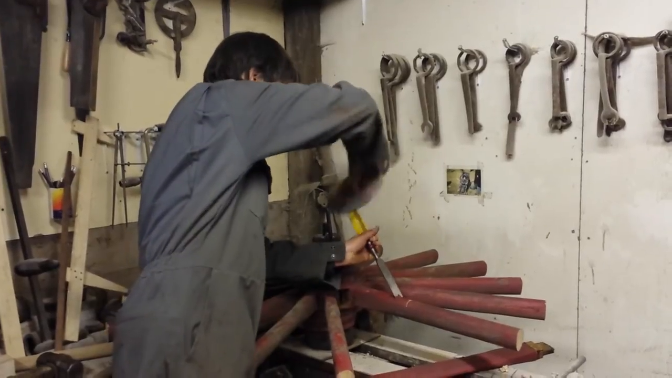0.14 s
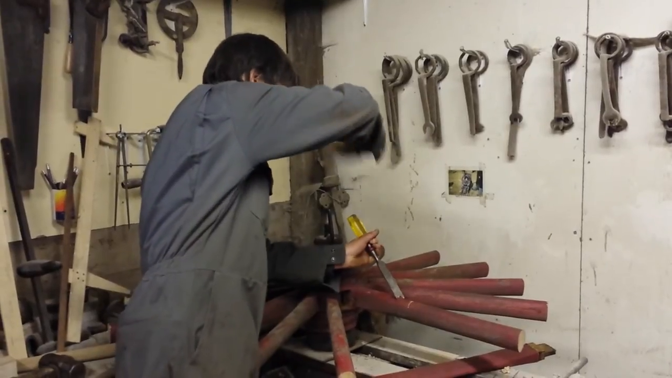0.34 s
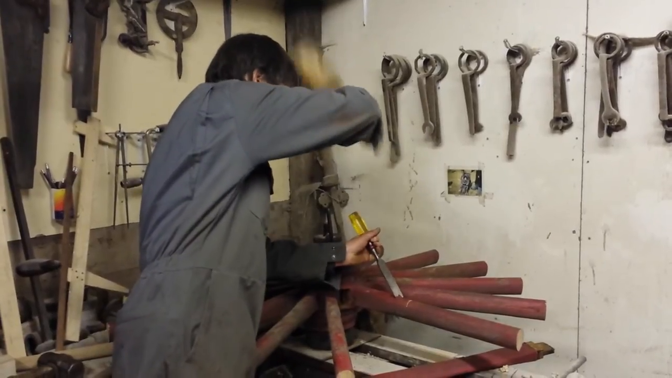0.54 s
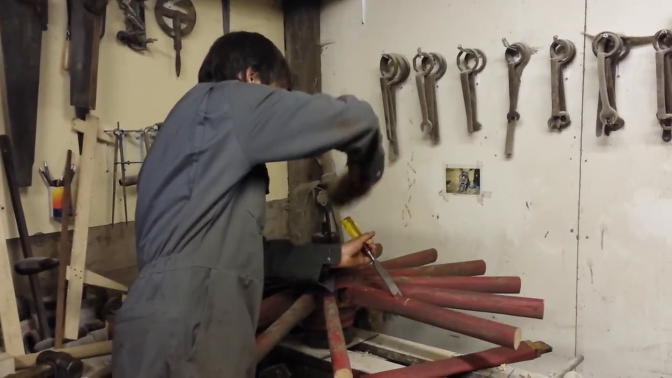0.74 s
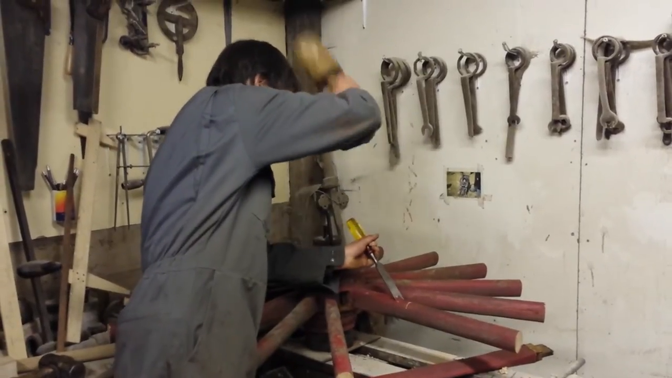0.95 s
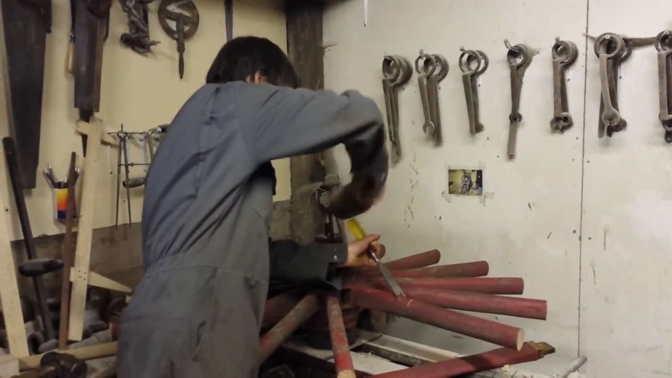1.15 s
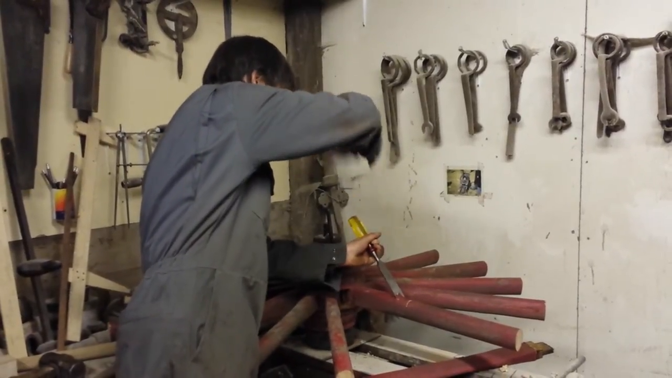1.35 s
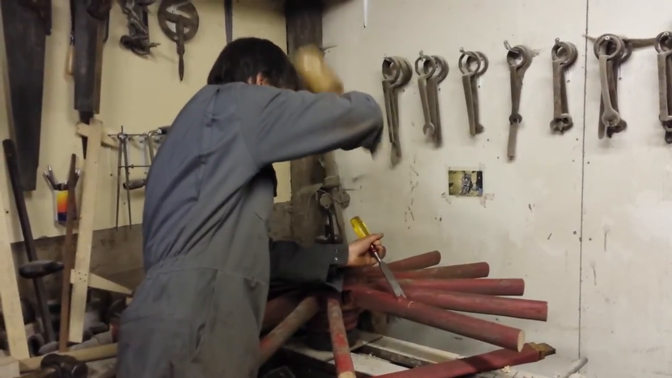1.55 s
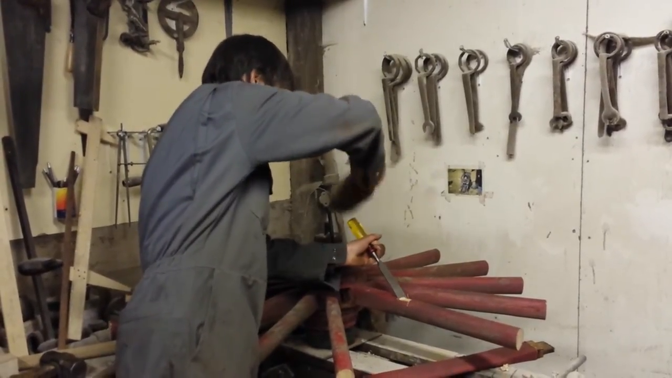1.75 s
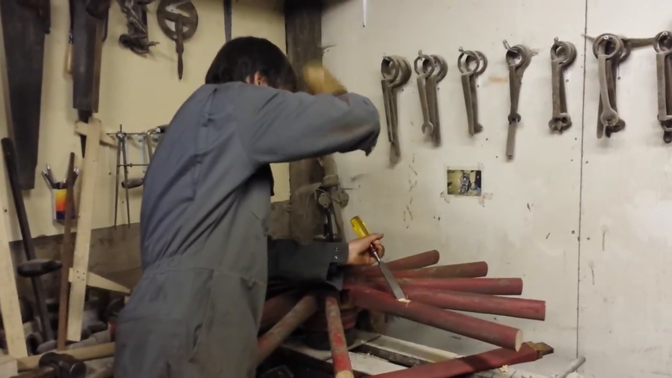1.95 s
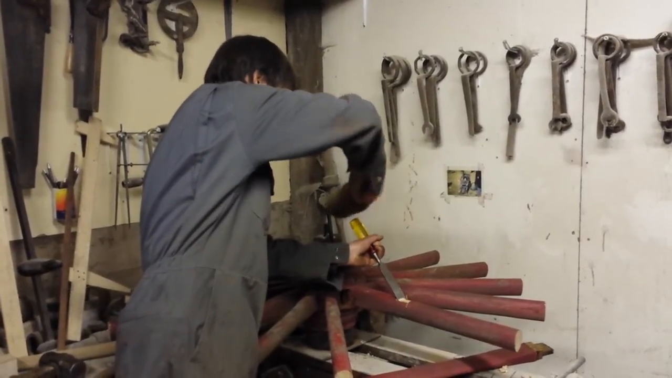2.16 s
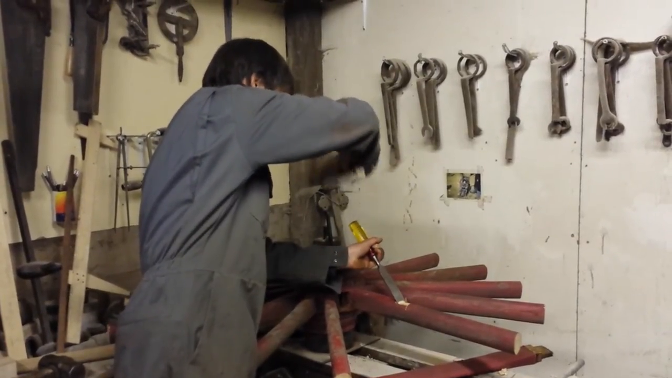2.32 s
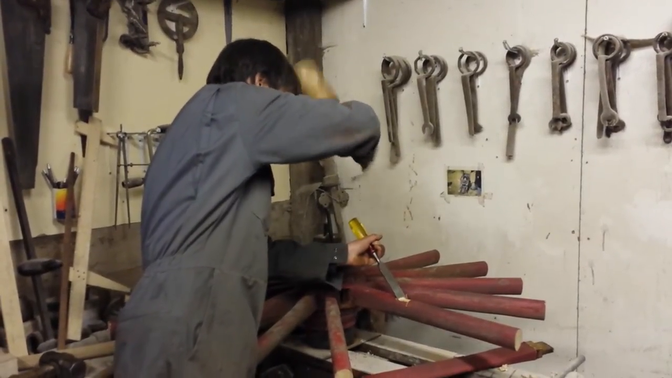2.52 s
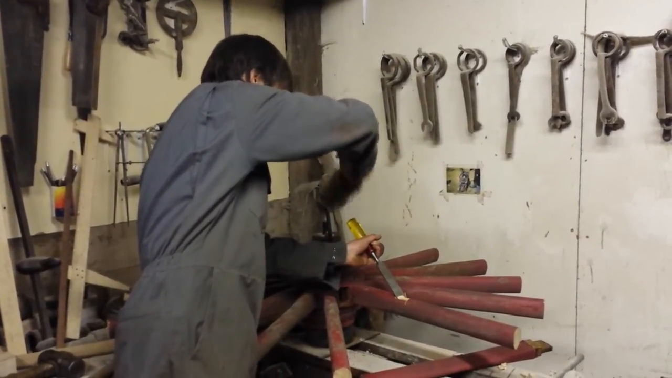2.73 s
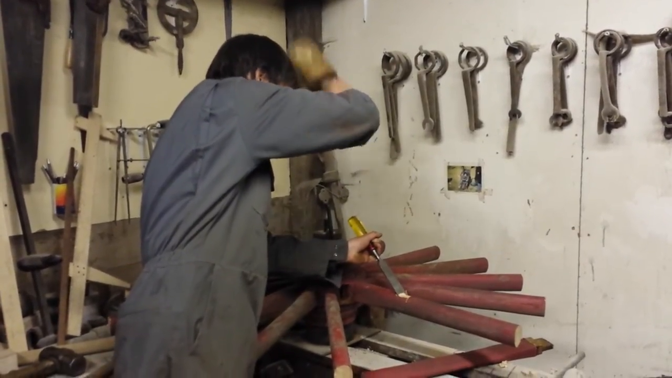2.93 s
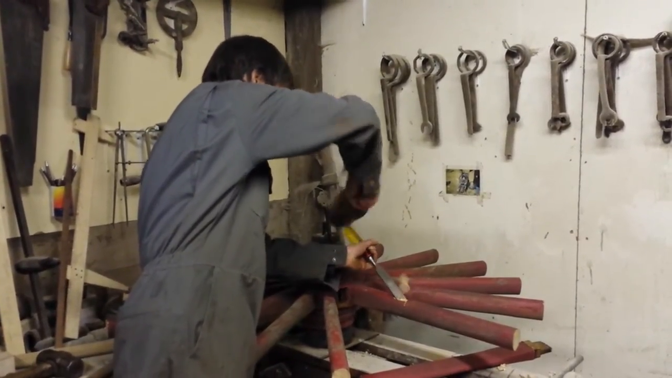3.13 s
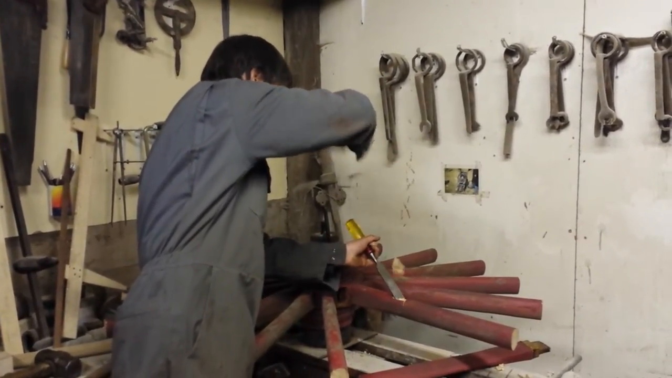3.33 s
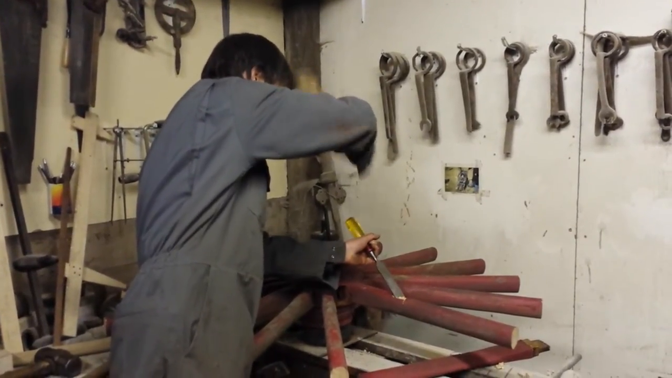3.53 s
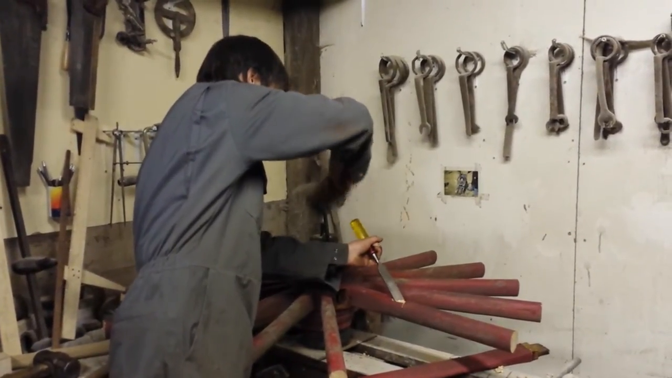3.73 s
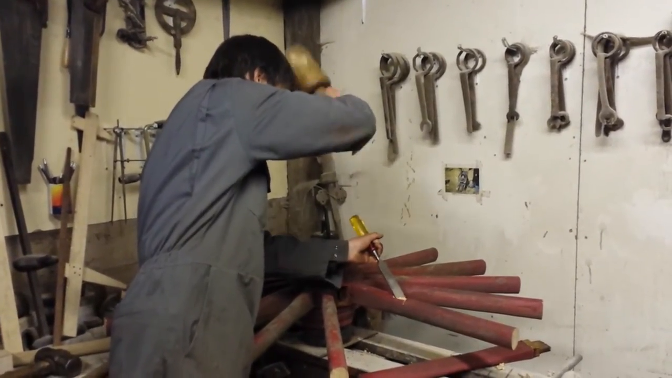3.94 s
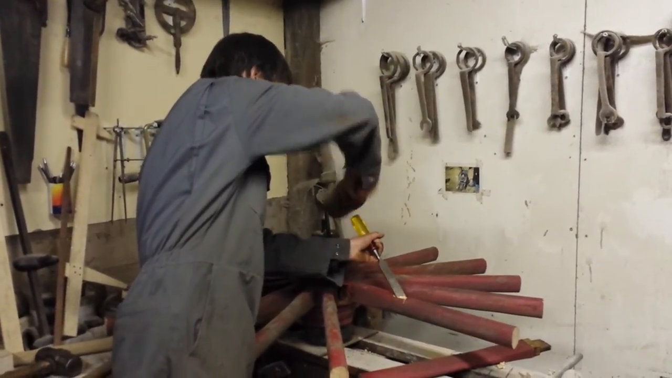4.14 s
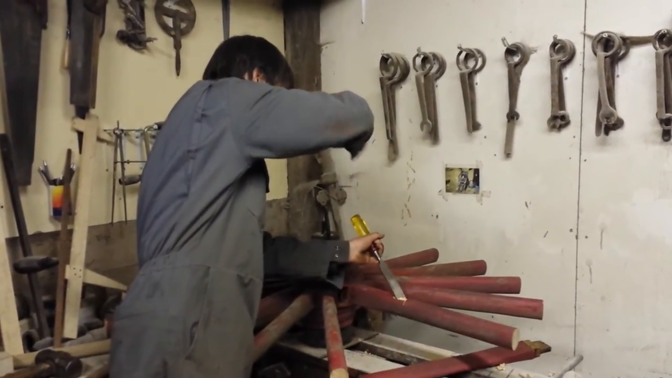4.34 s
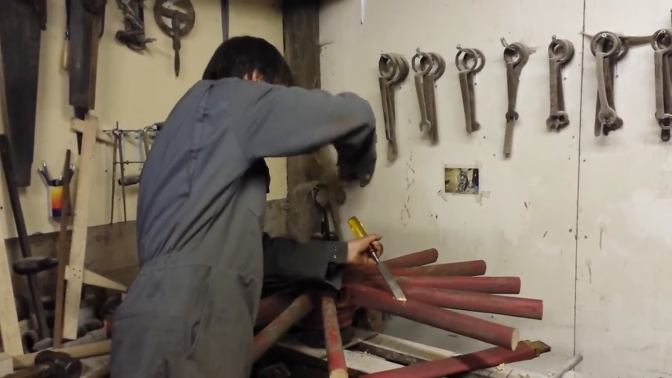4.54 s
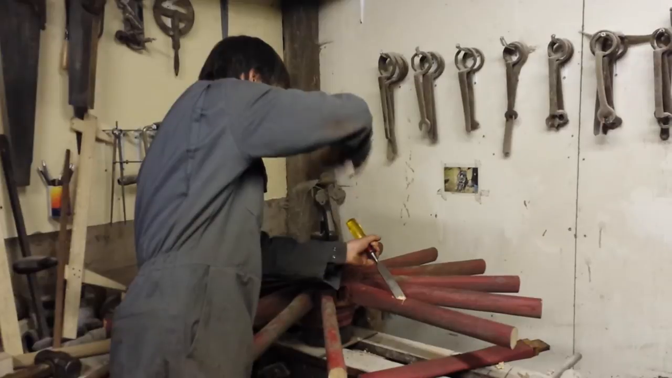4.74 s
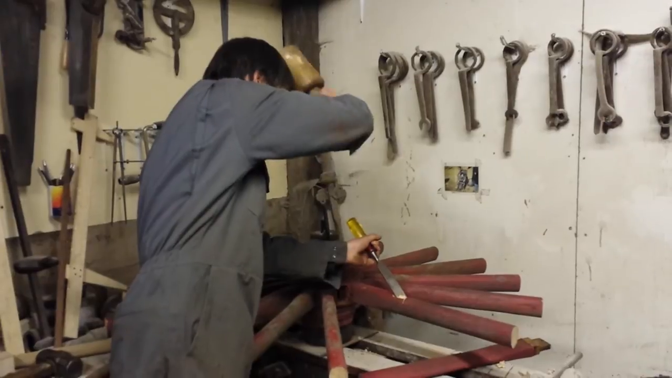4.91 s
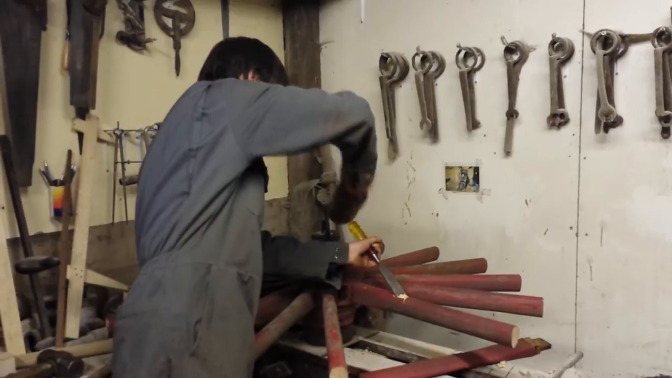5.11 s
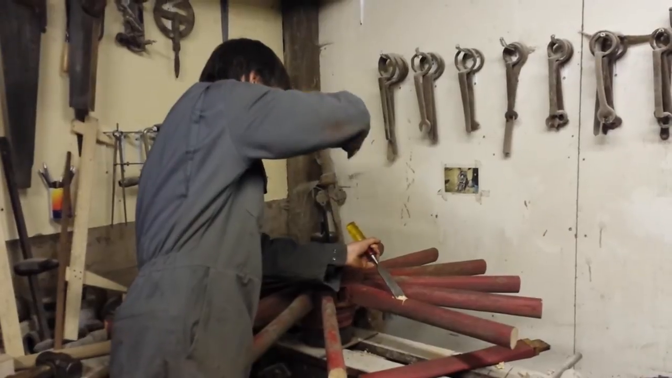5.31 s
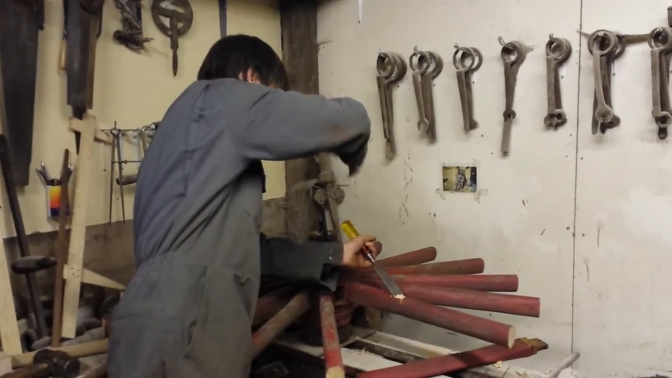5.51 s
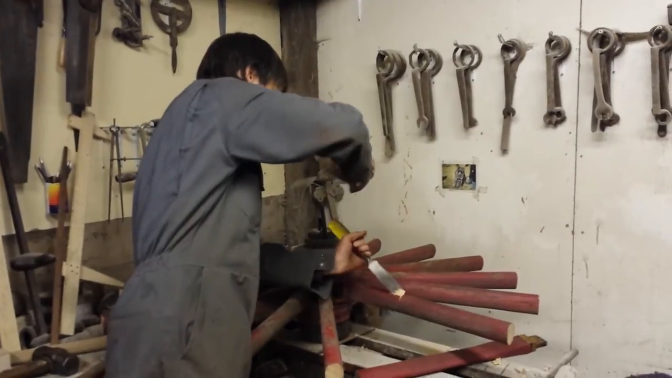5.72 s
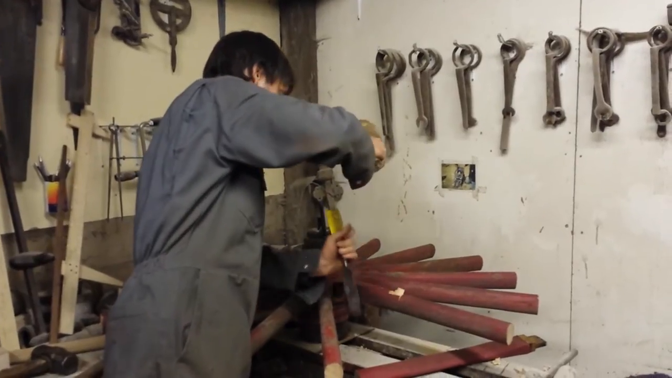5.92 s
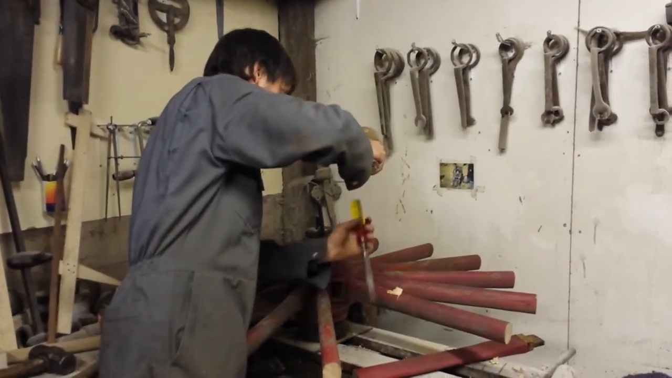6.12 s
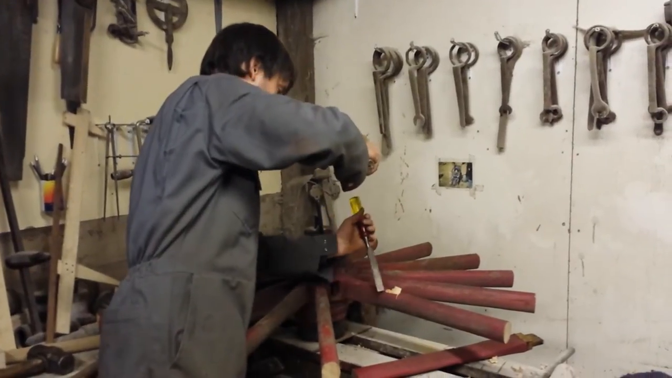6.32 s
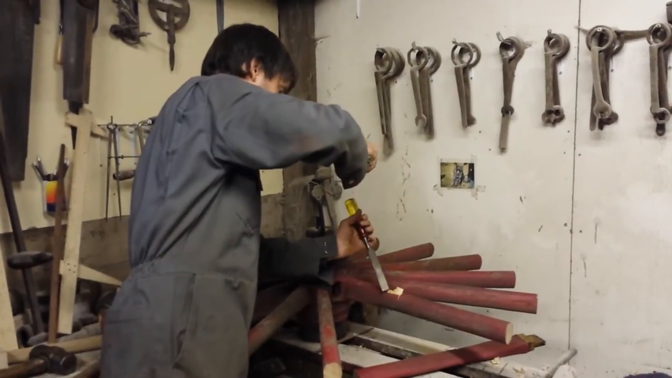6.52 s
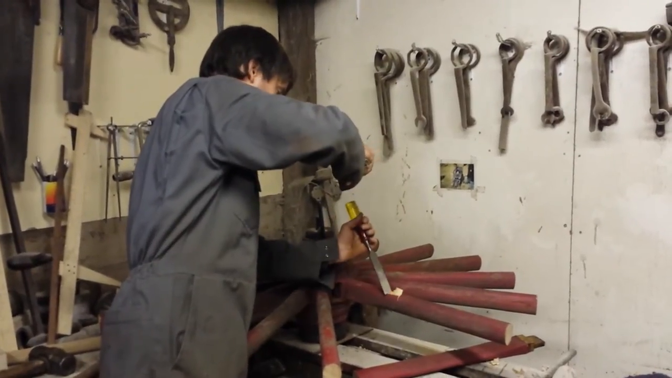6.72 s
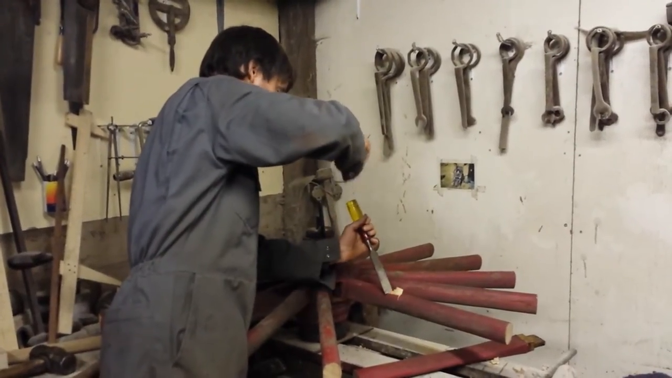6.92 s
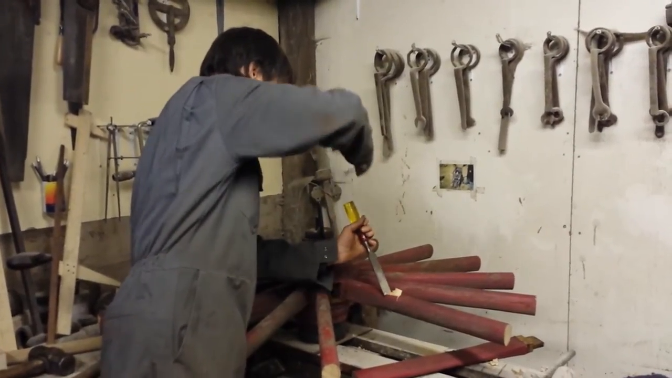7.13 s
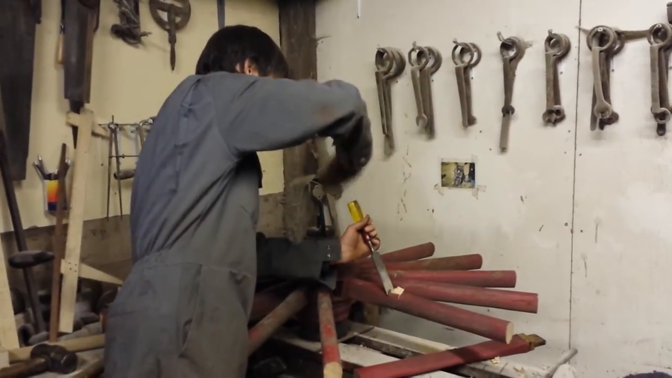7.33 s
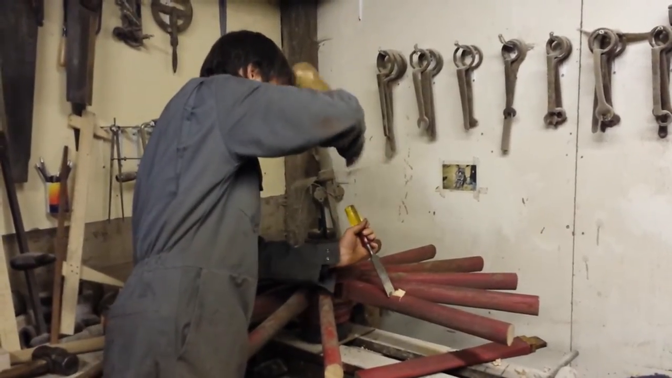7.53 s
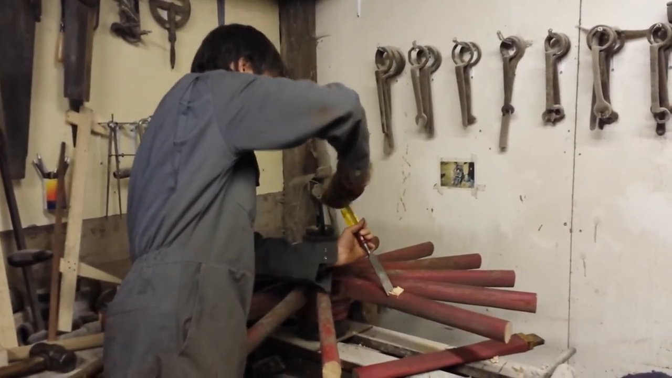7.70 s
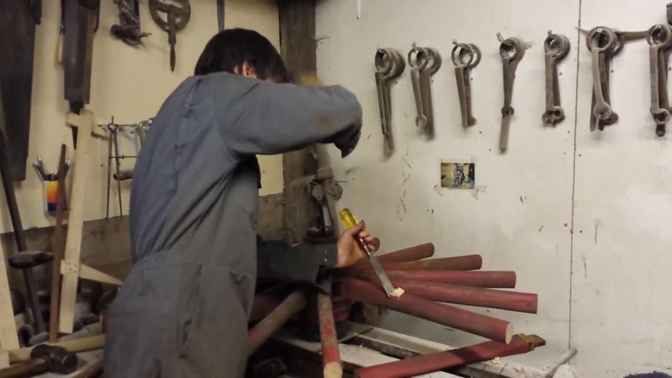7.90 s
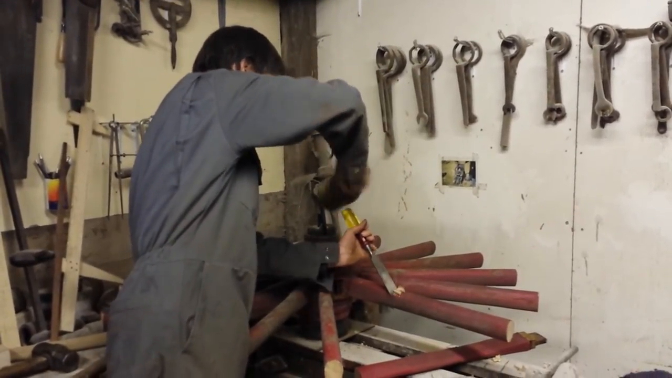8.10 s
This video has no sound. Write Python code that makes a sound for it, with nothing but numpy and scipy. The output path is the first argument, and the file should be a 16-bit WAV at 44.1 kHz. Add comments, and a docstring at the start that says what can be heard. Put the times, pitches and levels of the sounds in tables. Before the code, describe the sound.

In a small hard-walled workshop, a mallet drives a chisel into a log with loud, evenly spaced knocks, each a dull thud with a bright crack and short bench boom. Loose iron ticks and wood shivers between blows; small chips snap and land. The blows stop, the chisel edge touches the wood softly twice, then three quicker blows follow. Close stereo microphone, faint hiss.

```python
"""A small hard-walled workshop, with a stereo microphone a few steps from a log being cut with mallet and chisel.
Behind everything lie room tone and hiss; loose iron ticks and offcuts shiver after each blow, as decaying bursts.
Chips land as short pitched ticks, and in a pause the chisel edge is set twice on the wood.
Nearest are the blows: damped modes for logs and bench, coloured bursts for the dull thud and the bright crack."""
import sys
import numpy as np
from scipy import signal
from scipy.fft import rfft, irfft, next_fast_len
from scipy.io import wavfile
from scipy.ndimage import uniform_filter1d

SR = 44100
rng = np.random.default_rng(int(sys.argv[2]) if len(sys.argv) > 2 else 0)


def pcm_store(signal):
    """Save signal as 16-bit PCM."""
    levels = np.round(np.clip(np.atleast_2d(signal), -1, 1) * 32767)
    wavfile.write(sys.argv[1], SR, levels.astype(np.int16).T)


N = 359856  # samples, about 8.2 s
SECOND_CUT_S = 6  # blows after this time belong to the second cut


def amp(db):
    """Decibels to amplitude."""
    return 10 ** (np.asarray(db) / 20)


def unit(x):
    """Scale to an RMS of one."""
    return x / np.sqrt(np.mean(x ** 2) + 1e-20)


def along(points, hz):
    """Read a curve of (frequency [Hz], value) points on a log frequency axis."""
    f, v = np.transpose(points)
    return np.interp(np.log(hz + 1), np.log(f + 1), v)


def coloured(x, gain_db):
    """Pass x through a causal minimum-phase filter with this gain over frequency."""
    m = 2 * next_fast_len(x.shape[-1] // 2 + 4096)
    gain = amp(gain_db(np.fft.rfftfreq(m, 1 / SR)))
    cepstrum = irfft(np.log(gain + 1e-6), m)
    # folding the cepstrum onto positive times makes the filter causal
    cepstrum[..., 1:m // 2] *= 2
    cepstrum[..., m // 2 + 1:] = 0
    response = np.exp(rfft(cepstrum))
    return irfft(rfft(x, m) * response, m)[..., :x.shape[-1]]


# likeness of left and right in diffuse sound: (frequency [Hz], correlation [0-1])
LIKENESS = [(25, .7), (70, .996), (130, .985), (290, .89), (640, .8), (1390, .15), (3000, .05)]


def stereo_noise(size):
    """Spectrogram of stereo noise, alike in the bass and unrelated in the treble."""
    hz, t, (a, b) = signal.stft(rng.standard_normal((2, size)), SR, nperseg=256)
    turn = np.arccos(np.clip(along(LIKENESS, hz), -1, 1))[:, None] / 2
    left = np.cos(turn) * a + np.sin(turn) * b
    right = np.cos(turn) * a - np.sin(turn) * b
    return hz, t, np.array([left, right])


# reverberation of the workshop: (frequency [Hz], 60 dB decay time [s])
ROOM_DECAY = [(60, 0.89), (120, .6), (300, 0.4), (700, 0.37), (1500, 0.3), (4000, 0.3), (8000, .24),
              (11000, .19), (14000, 0.037)]
# early echoes: (delay [s], level against the direct sound, before the walls_db offset [dB])
WALL_ECHOES = [(.0045, 3), (.009, -5.5), (.0125, -12.5), (0.02, -18), (.031, -11)]


def in_room(sound, wet_db, walls_db=0):
    """Direct sound, early wall echoes and a fresh diffuse tail whose decay depends on frequency."""
    hz, t, z = stereo_noise(SR // 2)
    fade = amp(-60 * t / along(ROOM_DECAY, hz)[:, None])
    z = z * fade
    # each band keeps its usual strength, whatever the noise drew
    z *= np.linalg.norm(fade, axis=-1, keepdims=True) / np.linalg.norm(z, axis=-1, keepdims=True)
    response = signal.istft(z, SR, nperseg=256)[1]
    response *= 1 - np.exp(-np.arange(response.shape[1]) / SR / .0015)  # echoes thicken quickly
    response *= amp(wet_db) / np.linalg.norm(response, axis=1, keepdims=True)
    response[:, 0] += 1  # direct sound
    for delay_s, db in WALL_ECHOES:
        arrival_s = delay_s + rng.normal(0, .0002, 2)  # slightly apart in left and right
        response[[0, 1], np.round(arrival_s * SR).astype(int)] += amp(db + walls_db)
    return signal.fftconvolve(sound[None], response, axes=1)


def ring(modes, t, spread_db, attack):
    """Damped modes (frequency [Hz], level [dB], 60 dB decay [s]), struck at new strengths each time."""
    hz, db, t60 = np.transpose(modes)[..., None]
    level = db + spread_db * rng.standard_normal(hz.shape)
    envelope = amp(level - 60 * t / t60) * (1 - np.exp(-t / attack))
    return envelope * np.sin(2 * np.pi * hz * t)


def burst(t, t60, grit, gain_db):
    """A contact pulse with gritty decaying noise, coloured; the energy of one millisecond at amplitude 1."""
    noise = amp(-60 * t / t60) * rng.standard_normal(len(t))
    pulse = t == 0
    puff = coloured(pulse + grit * noise / np.linalg.norm(noise), gain_db)
    return puff / np.linalg.norm(puff) * np.sqrt(SR / 1000)


def add(track, s, sound):
    """Mix into a track that starts one second early."""
    part = track[..., SR + round(s * SR):][..., :sound.shape[-1]]
    part += sound[..., :part.shape[-1]]


# spectrum of room tone and microphone hiss: (frequency [Hz], relative level per Hz [dB])
HUSH_SPECTRUM = [(20, -6), (50, -10), (104, 1), (125, -4), (200, -3), (400, -10), (800, -14), (2000, -18),
                 (4000, -20), (6200, -15), (8000, -21), (12000, -24), (14500, -25), (15000, -50)]
HUSH_DB = -69  # RMS level


def hush():
    """Room tone and hiss: coloured stereo noise with slow, smooth patches of level."""
    z = stereo_noise(N)[2]
    patches = rng.standard_normal(z.shape[1:])
    patches = uniform_filter1d(patches, size=4, axis=0)  # over frequency
    patches = uniform_filter1d(patches, size=30, axis=1)  # over time
    noise = signal.istft(z * amp(2.1 * unit(patches)), SR, nperseg=256)[1][:, :N]
    return amp(HUSH_DB) * unit(coloured(noise, lambda hz: along(HUSH_SPECTRUM, hz)))


# modes of the loose iron tool: (frequency [Hz], relative level [dB], 60 dB decay time [s])
IRON_MODES = [(2990, -4, .015), (3700, -4, .015), (4285, -6, .015), (5943, 1, .025), (6940, -5, .015),
              (8592, -6, .04)]
# spectrum of the shivering offcuts: (frequency [Hz], relative level per Hz [dB])
OFFCUT_SPECTRUM = [(150, -20), (330, -11.5), (520, -0.5), (750, -10.5), (1500, -14.5), (3000, -31.5)]
IRON_RING_DB, IRON_FADE_DB_PER_S = -1, 9  # gain of the ring beside its click; fade after a blow
WOOD_DB, WOOD_FADE_DB_PER_S = -52, 22.5  # offcuts against the level of the blow; fade after a blow
SETTLE_S, SETTLE_DB_PER_S = 0.68, 150  # left alone this long, everything comes to rest
ROCK_S, ROCK_SCATTER_S = .026, .0015  # time between contacts of the rocking iron


def chatter():
    """Each blow leaves a loose iron tool rocking in faint ticks and offcuts shivering until they settle."""
    blow_s, blow_db, *_, shaken_db = np.transpose(BLOWS_STRUCK)
    times = np.cumsum(rng.normal(ROCK_S, ROCK_SCATTER_S, size=400))
    times = times[times < N / SR]
    last = np.searchsorted(blow_s, times) - 1
    since = times - blow_s[last]
    settle_db = SETTLE_DB_PER_S * np.maximum(since - SETTLE_S, 0)
    iron_db = shaken_db[last] - IRON_FADE_DB_PER_S * since - settle_db
    wood_db = blow_db[last] + WOOD_DB - WOOD_FADE_DB_PER_S * since - settle_db
    # contacts take turns on three tracks, each given its own room response
    tool, offcuts = np.zeros((3, N + SR)), np.zeros((3, N + SR))
    t = np.arange(SR // 16) / SR
    for k, at in enumerate(times):
        click = burst(t, .008, 2.5, lambda hz: -4 * np.log2(hz / 5500 + 1e-3) ** 2)
        iron_ring = ring(IRON_MODES, t, spread_db=3, attack=.0005).sum(0)
        iron = amp(IRON_RING_DB) * iron_ring + click
        wood = burst(t, 0.037, 2.2, lambda hz: along(OFFCUT_SPECTRUM, hz))
        add(tool[k % len(tool)], at, amp(iron_db[k] + rng.normal(0, 2.5)) * iron)
        wood_s = at + rng.uniform(0, ROCK_S)
        add(offcuts[k % len(offcuts)], wood_s, amp(wood_db[k] + rng.normal(0, 3.6)) * wood)
    placed = [in_room(a, wet_db=5.5, walls_db=-8) + in_room(b, wet_db=9.5) for a, b in zip(tool, offcuts)]
    return sum(placed)[:, :N + SR]


# chips snapping and landing: (time [s], level [dB], pitch [Hz], body against the tick [dB])
CHIPS_LANDING = [(2.6413, -23.5, 6462, -16), (2.9729, -43.5, 7440, -14.5), (3.5872, -49.5, 9240, -18.5),
                 (3.8343, -32, 5667, -9.5), (4.0736, -53.5, 5680, -7), (4.892, -56.5, 5890, 3.5),
                 (5.6608, -54.5, 5900, -13), (5.672, -43.5, 6100, -17), (5.7268, -52.5, 6320, -7),
                 (5.7522, -39.5, 5603, -16), (5.7583, -39, 6380, -34), (5.8481, -55.5, 5600, -5),
                 (5.8812, -43.5, 6180, -8), (5.8881, -41.5, 6450, -8), (6.1386, -69.5, 6090, -7),
                 (7.0094, -69.5, 5880, -10)]
# modes of the chisel blade: (frequency [Hz], relative level [dB], 60 dB decay time [s])
BLADE_MODES = [(4240, -4, 0.0098), (4220, 3, 0.009), (5200, -2.5, 0.013)]
# a chip glances off the blade: (time [s], ring level [dB])
BLADE_GLANCES = [(3.836, -39)]
CHIP_T60_S = 0.015


def chips():
    """Each chip is a dry tick around its own pitch, thin below it, with some body; one touches the blade."""
    track, t = np.zeros((2, N + SR)), np.arange(SR // 5) / SR
    for s, db, pitch_hz, body_db in CHIPS_LANDING:

        def tick_gain_db(hz):
            octaves = np.log2(hz / pitch_hz + 0.0007)
            return -np.where(hz < pitch_hz, 30, 12) * octaves ** 2

        tick = burst(t, CHIP_T60_S, 2.3, tick_gain_db)
        body = burst(t, CHIP_T60_S, 0.53, lambda hz: -9 * np.log2(hz / 1800 + 0.0023) ** 2)
        add(track, s, amp(db) * in_room(tick + amp(body_db) * body, wet_db=0.5, walls_db=-4.0))
    for s, db in BLADE_GLANCES:
        blade = ring(BLADE_MODES, t, spread_db=2, attack=.0005).sum(0)
        add(track, s, amp(db) * in_room(blade, wet_db=4.5, walls_db=6.0))
    return track


# modes of the logs, relative levels:
# (frequency [Hz], level at the first cut [dB], level at the second cut [dB], level under a tap [dB])
LOG_MODES = [(254, -10.5, -9.5, -4.5), (276, -18.5, -21, -7), (440, -8, -7.5, 3), (530.5, -6, -5, 3),
             (566.2, 5, -3.5, 1), (569, -10.5, -5, -2), (735, -8, -5.5, 2), (741, 0, 5, -21),
             (833, -11, -11.5, -14), (972, -17, -1.5, -24), (1180.6, 1, -15, -12), (1162, -0.5, -13, -4),
             (1285, -0.5, -11.5, 4.5), (1440, 5, 8.5, -5), (1635, -3, 7.5, 4), (1882, -0.5, -5, -4),
             (1900, 2.5, -9, -14), (2157, -2, -15, -33)]


def knock(t, column, upper_db, spread_db):
    """The logs ring; where the edge sits decides how strong each mode is."""
    hz, db = np.array(LOG_MODES)[:, [0, column]].T
    t60 = .065 * np.sqrt(600 / hz)  # wood damps its upper modes sooner
    upper_share = np.clip(np.log2(hz / 800), 0, 1)  # from none at 800 Hz to all at 1600 Hz
    sign = (-1) ** np.arange(len(hz))  # neighbouring modes start in opposite directions
    modes = np.c_[hz, db + upper_db * upper_share, t60]
    return sign @ ring(modes, t, spread_db, attack=.0005)


# the chisel edge set on the log: (time [s], level [dB], lift of the upper knock [dB])
EDGE_TAPS = [(6.3613, -61, 4.5), (6.7202, -59, 1)]


def taps():
    """The edge touches down softly: the logs ring over a faint scuff and an airy rustle of the sleeve."""
    track, t = np.zeros((2, N + SR)), np.arange(SR // 3) / SR
    for s, db, upper_db in EDGE_TAPS:
        logs = knock(t, column=3, upper_db=upper_db, spread_db=2.9)
        scuff = burst(t, 0.036, 1.0, lambda hz: -3 * np.log2(hz / 900 + 1e-3) ** 2)
        rustle = burst(t, 0.29, 30, lambda hz: -5 * np.log2(hz / 7000 + 1e-3) ** 2)
        touch = logs + amp(5.0) * scuff + rustle
        add(track, s, amp(db) * in_room(touch, wet_db=9))
    return track


# mallet blows: (time [s], level [dB], lift of the upper knock [dB], crack against the blow [dB],
# tilt of the crack's top octave [dB], iron chatter just after the blow [dB])
BLOWS_STRUCK = [(-.3, -4, -6.5, -5, -3.5, -66), (0.1954, -4.5, -5, -9.5, 2, -67.5),
                (0.707, -8.5, -5, -6.5, -3, -73.5), (1.218, -10.5, -4.5, -4, -7, -76.5),
                (1.7236, -12, -3, -3, -1, -82.5), (2.2136, -8, -3, -7, -7, -68),
                (2.6866, -7, -8.5, -9, -2, -64.5), (3.1685, -11, -4, -4, -4.5, -71),
                (3.6626, -11, -7, -8.5, -1.5, -66), (4.1466, -8, -5, -10, -3, -67.5),
                (4.6402, -5.5, -7.5, -9.5, -4.5, -74), (5.1305, -8.5, -2.5, -4, 5.5, -65),
                (7.264, -6, -6.5, -12, -2, -65.5), (7.7009, -6.5, -6, -10.5, -2.5, -60.5),
                (8.1467, -7, -7.5, -7, -3.5, -66.5)]
# spectrum of the dull thud: (frequency [Hz], relative level per Hz [dB])
THUD_SPECTRUM = [(30, -49.5), (70, -32), (130, -20.5), (240, -15), (330, -16.5), (450, -2.5), (750, -2),
                 (1150, -4), (1650, 3.5), (2200, -3), (3000, -25), (5000, -65.5)]
# spectrum of the crack at the chisel: (frequency [Hz], relative level per Hz [dB])
CRACK_SPECTRUM = [(1470, -8.5), (2500, -9), (3180, -9.5), (4240, -8.5), (4790, -5.5), (6100, -4.5),
                  (7150, -5.5), (8770, -11.5), (10100, -17.5), (14100, -27), (15200, -48)]
# modes of the bench: (frequency [Hz], relative level [dB], 60 dB decay time [s])
BENCH_MODES = [(108, 0, .68), (114, 0, .68), (70, -14, .4), (170, -10, .4), (200, -12, .8)]
BOOM_DB, BOOM_LOSS_DB = -25.5, 16  # bench boom against the blow; weaker by this at the second cut
LOGS_BRIGHTER_DB = 6.5  # the logs keep more upper knock than the thud


def mallet():
    """Each blow knocks the logs with a dull thud, cracks at the chisel and sets the bench booming."""
    track = np.zeros((2, N + SR))
    t, boom_t = np.arange(SR // 5) / SR, np.arange(SR) / SR
    for s, db, upper_db, crack_db, top_db, _ in BLOWS_STRUCK:
        second_cut = s > SECOND_CUT_S
        upper_tilt, top_tilt = [(900, 0), (1300, upper_db)], [(7500, 0), (10000, top_db)]
        thud = burst(t, .006, .3, lambda hz: along(THUD_SPECTRUM, hz) + along(upper_tilt, hz))
        crack = burst(t, 0.014, 0.61, lambda hz: along(CRACK_SPECTRUM, hz) + along(top_tilt, hz))
        logs = knock(t, column=1 + second_cut, upper_db=upper_db + LOGS_BRIGHTER_DB, spread_db=5.56)
        blow = amp(-25.0) * logs + amp(-4) * thud + amp(crack_db) * crack
        add(track, s, amp(db) * in_room(blow, wet_db=8.5))
        one, two, *rest = ring(BENCH_MODES, boom_t, spread_db=.6, attack=.03)
        boom = one - two + sum(rest)  # two close modes swell and beat
        add(track, s + 0.027, amp(db + BOOM_DB - BOOM_LOSS_DB * second_cut) * boom)
    return track


def scene():
    """The work at the log over the hush of the workshop."""
    work = (chatter() + chips() + taps() + mallet())[:, SR:]
    # small objects radiate little deep bass
    return hush() + coloured(work, lambda hz: along([(30, -36), (60, -8), (100, 0)], hz))


# treble resonances of the two microphone ports: (frequency [Hz], left over right [dB])
PORT_BALANCE = [(300, .6), (1400, -.6), (2500, 3.5), (4200, 1.5), (6100, 10), (7600, -2), (10000, -6),
                (14500, -8)]
TOP_HZ = 15375  # band limit


def record(dry):
    """Each port has its own treble resonance; peaks round off softly; nothing passes above the band limit."""
    half_each = np.array([[.5], [-.5]])
    ports = coloured(dry, lambda hz: half_each * along(PORT_BALANCE, hz))
    ports = ports / (1 + np.abs(ports / 1.05) ** 4) ** (1 / 4)
    return irfft(rfft(ports) * (np.fft.rfftfreq(N, 1 / SR) < TOP_HZ), N)


dry = scene()
out = record(dry)
pcm_store(out)
```